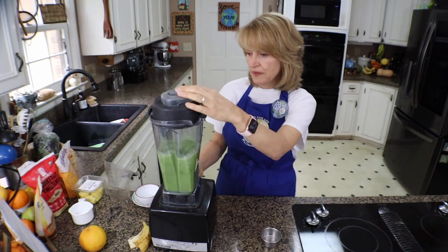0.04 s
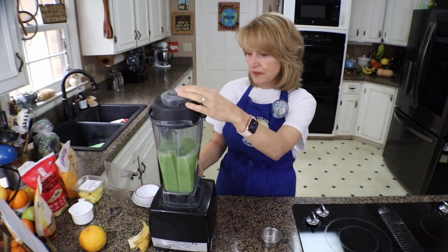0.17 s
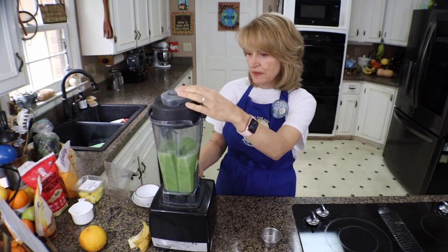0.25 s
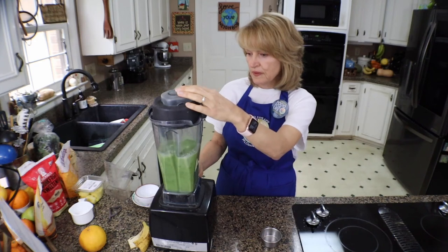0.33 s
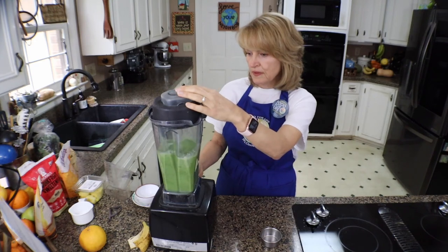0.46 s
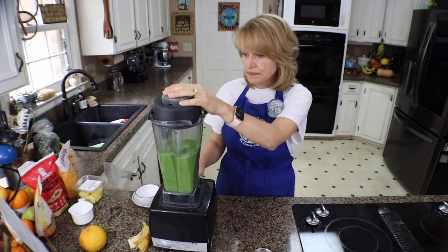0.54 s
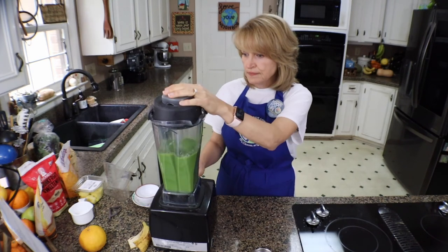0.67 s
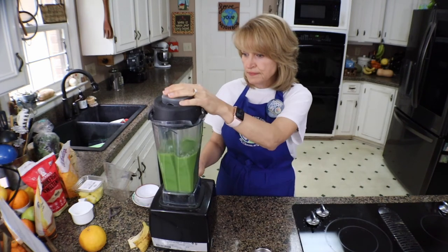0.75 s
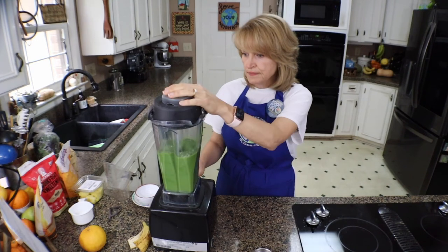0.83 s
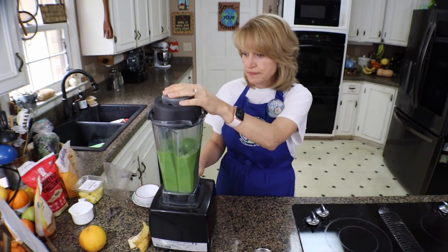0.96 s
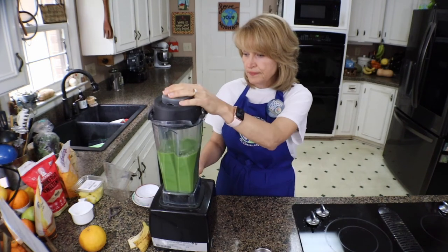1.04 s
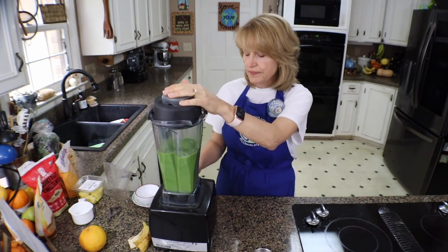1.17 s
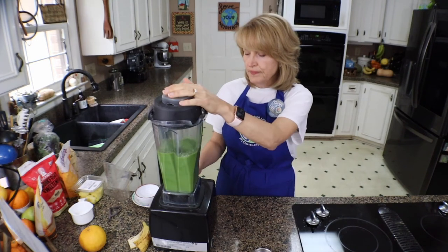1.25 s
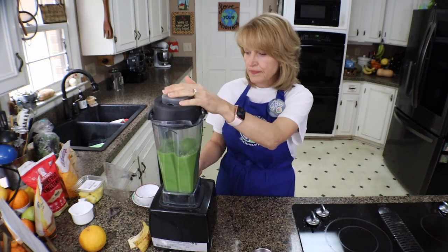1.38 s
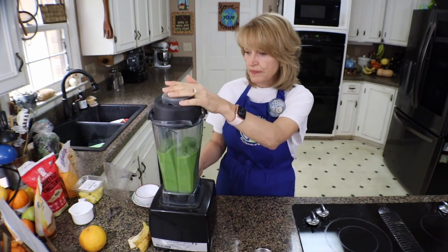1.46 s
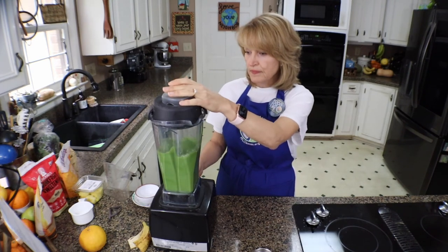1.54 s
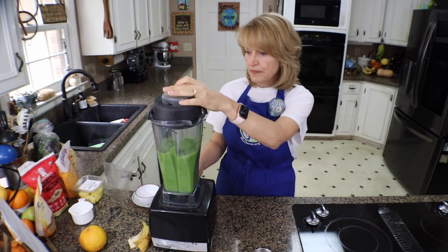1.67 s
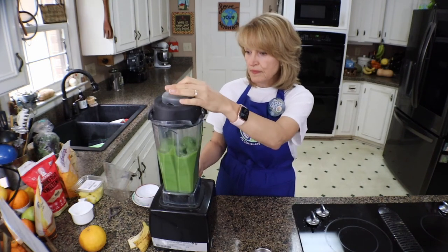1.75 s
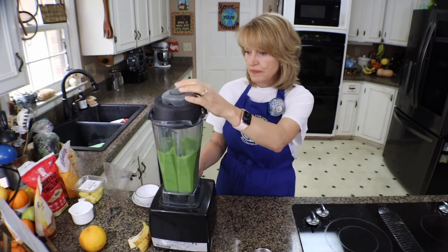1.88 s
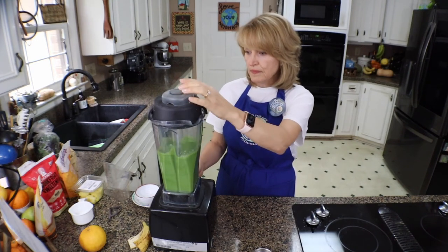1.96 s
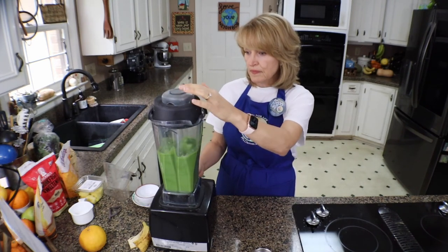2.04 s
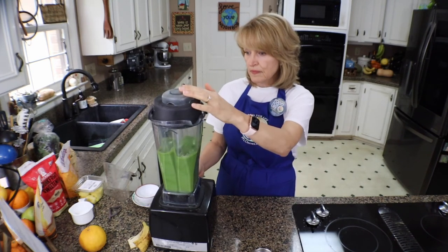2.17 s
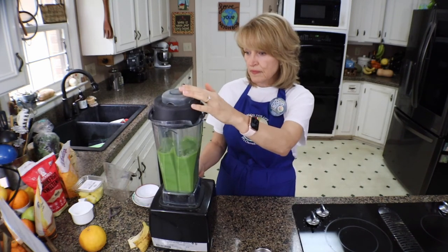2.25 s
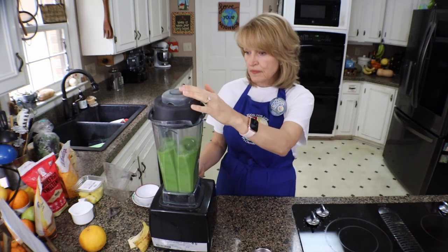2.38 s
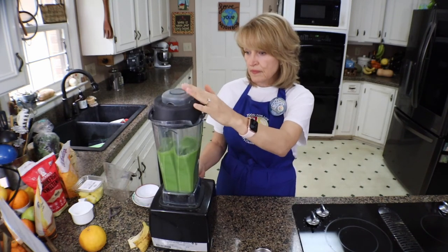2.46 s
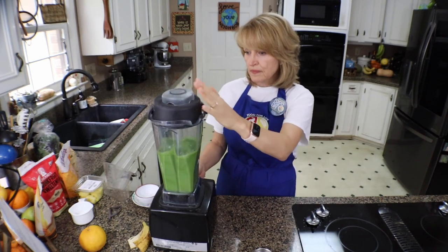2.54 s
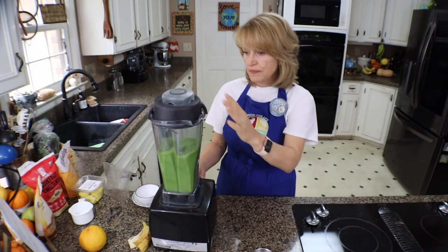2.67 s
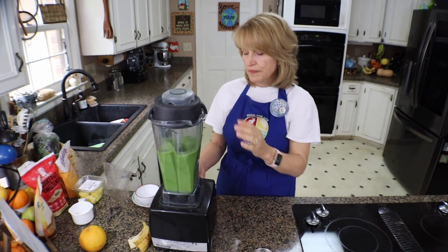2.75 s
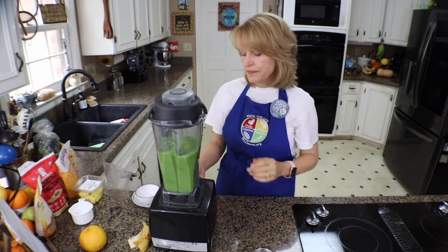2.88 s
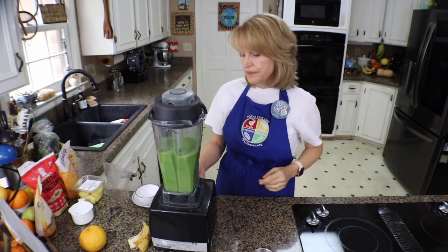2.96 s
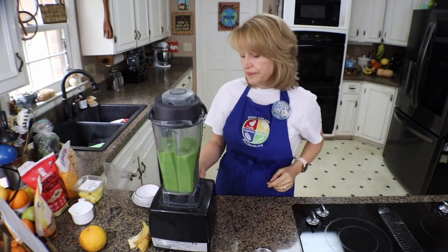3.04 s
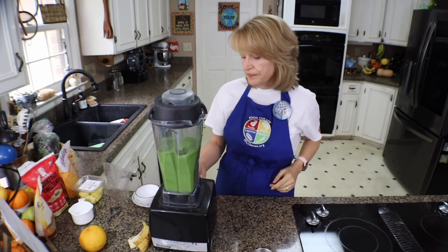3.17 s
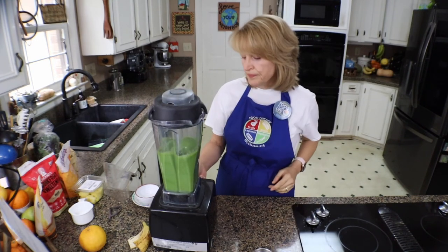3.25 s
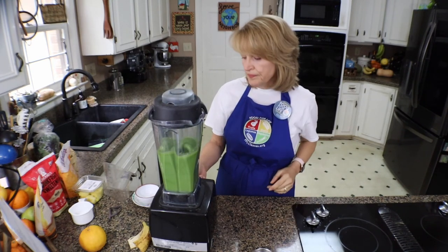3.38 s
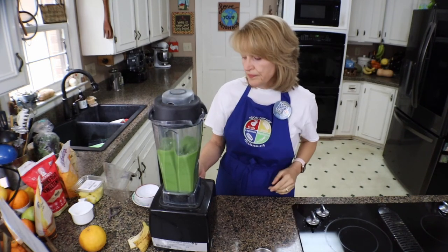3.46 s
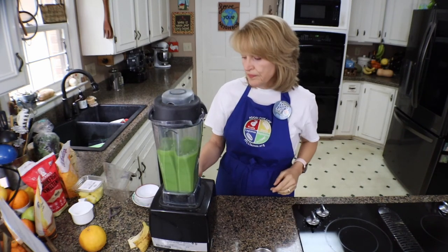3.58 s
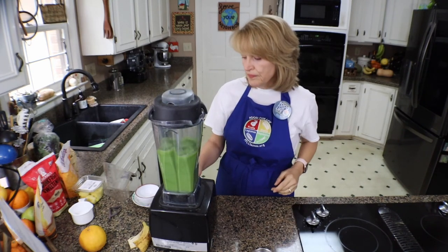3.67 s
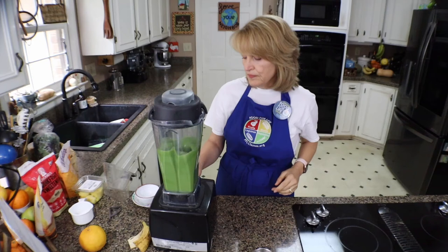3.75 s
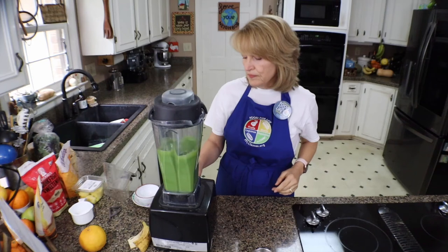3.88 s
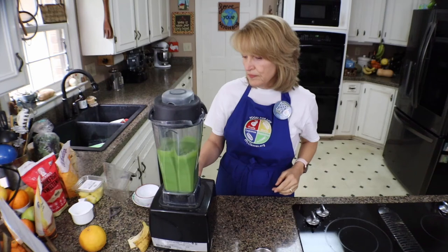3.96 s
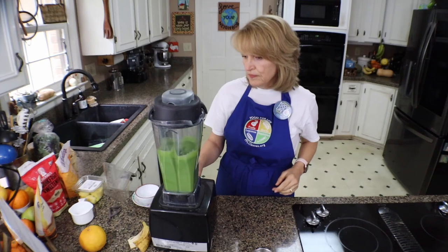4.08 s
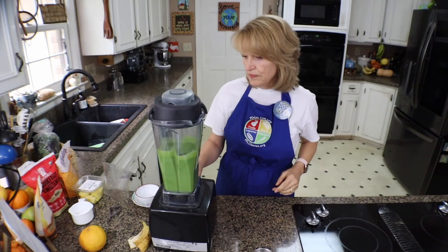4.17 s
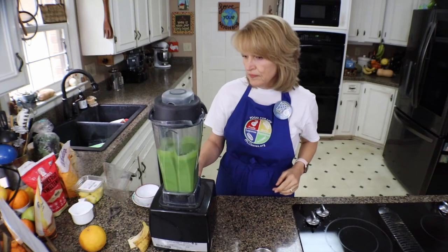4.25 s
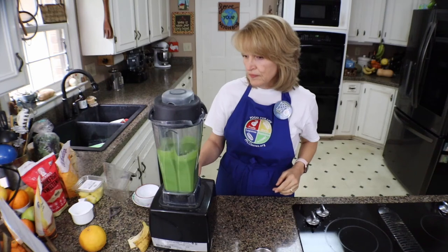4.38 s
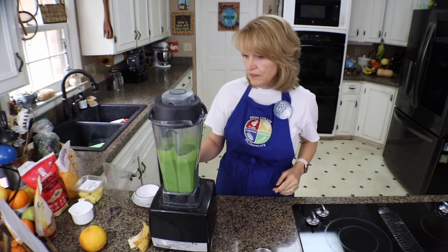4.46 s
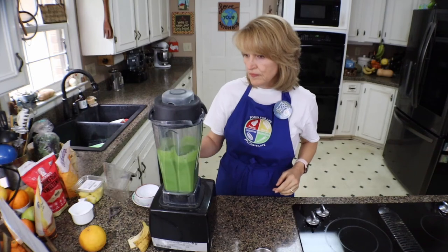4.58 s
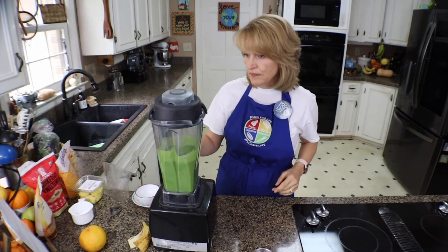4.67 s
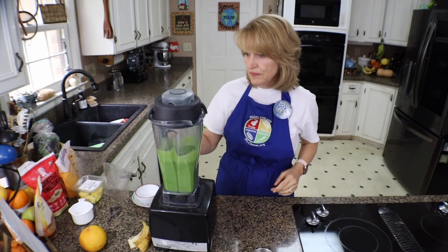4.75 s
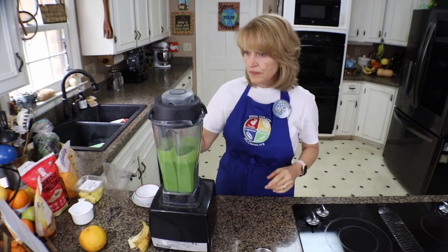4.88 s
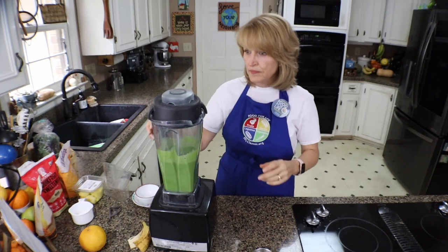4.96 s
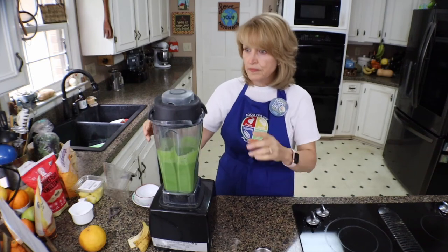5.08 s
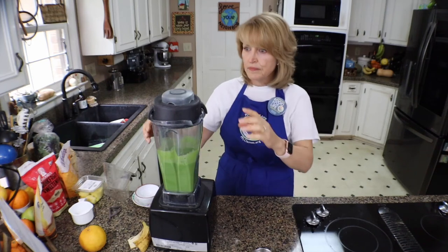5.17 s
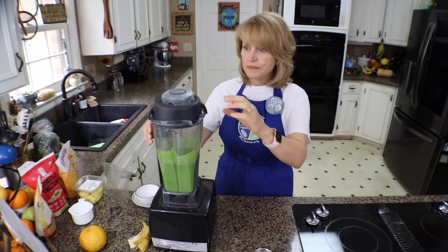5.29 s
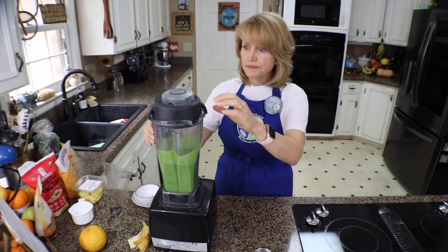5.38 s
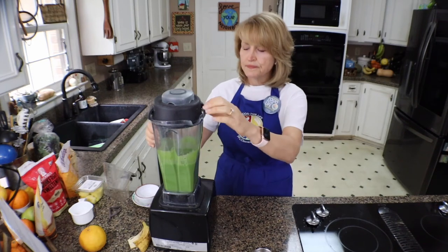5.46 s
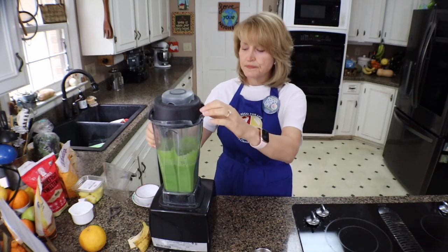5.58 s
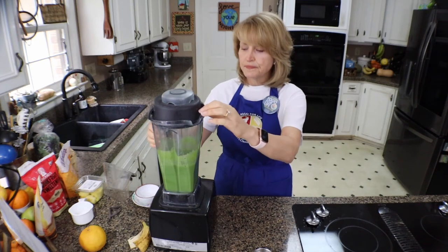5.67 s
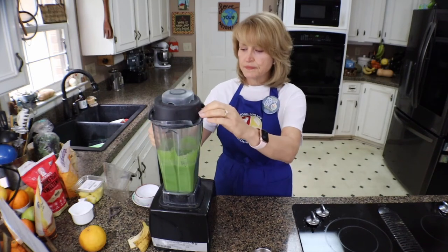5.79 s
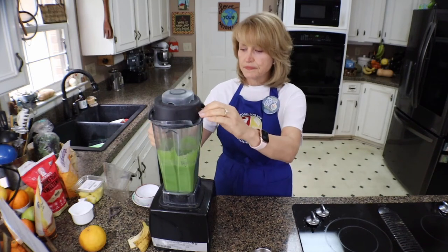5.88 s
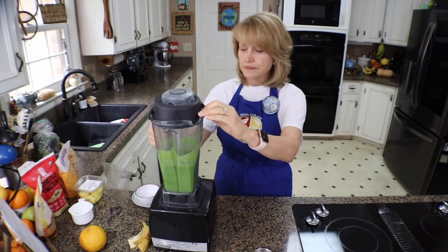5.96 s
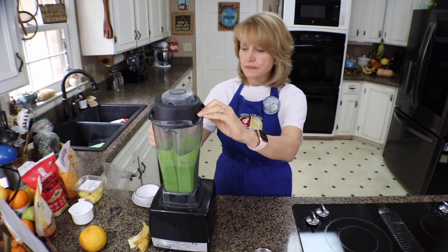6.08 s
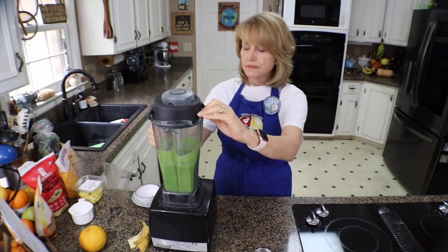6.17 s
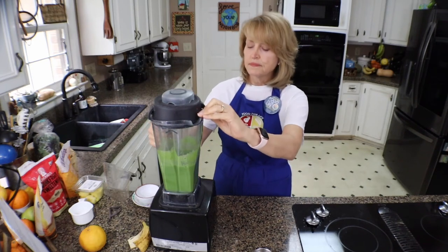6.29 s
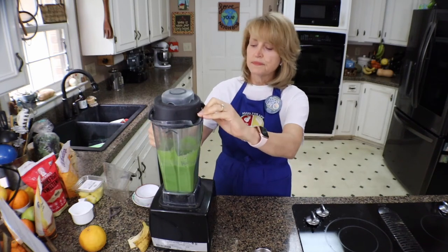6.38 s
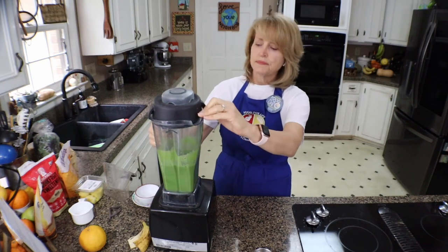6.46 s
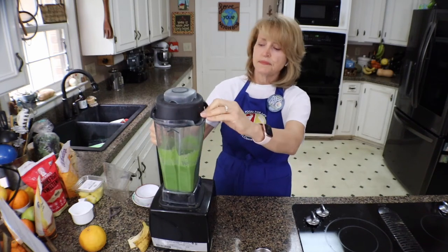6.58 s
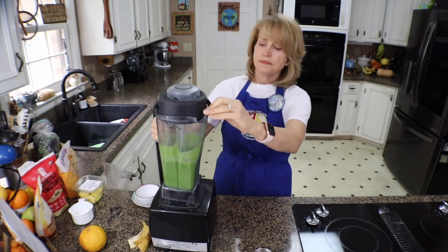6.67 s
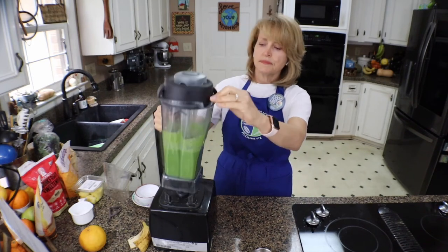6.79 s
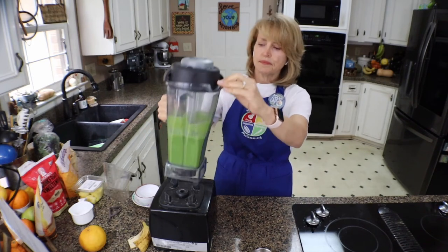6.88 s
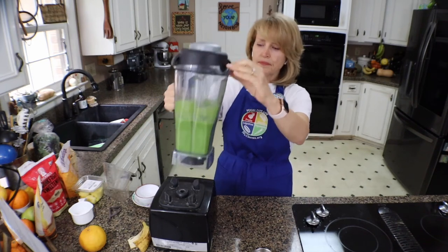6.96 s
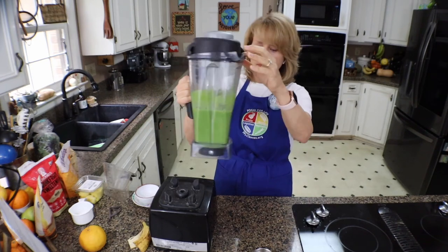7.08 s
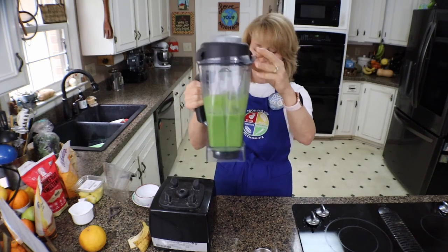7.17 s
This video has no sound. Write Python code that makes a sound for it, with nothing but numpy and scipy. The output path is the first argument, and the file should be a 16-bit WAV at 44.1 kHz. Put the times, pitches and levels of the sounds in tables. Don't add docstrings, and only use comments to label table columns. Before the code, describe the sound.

Loud close blender whine and churning roar for four seconds, a falling coast-down with knocks, then quiet plastic ticks and a jar lifted from its base.

```python
import sys
import numpy as np
from scipy import signal
from scipy.fft import rfft, irfft, next_fast_len
from scipy.io import wavfile
from scipy.ndimage import uniform_filter1d

SR = 44100
rng = np.random.default_rng(int(sys.argv[2]) if len(sys.argv) > 2 else 0)


def output_pcm(signal):
    pcm = np.clip(np.atleast_2d(signal).T, -1, 1) * 32767
    wavfile.write(sys.argv[1], SR, np.round(pcm).astype(np.int16))


def field_ratio(decibels):
    return 10 ** (np.asarray(decibels, dtype=float) / 20)


N = 318837
T = np.arange(N) / SR
FULL_TURNS = 352


def rms_one(x):
    return x / np.sqrt(np.mean(x ** 2) + 1e-20)


def drift(rate):
    r = np.exp(-40 * np.pi * rate / SR)
    slow = signal.lfilter([1], [1, -2 * r, r * r], rng.standard_normal(N // 20 + 4002))[4000:]
    return np.interp(np.arange(N) / 20, np.arange(len(slow)), rms_one(slow - slow.mean()))


def flutter(db, rate):
    r = np.exp(-64 * np.pi * rate / SR)
    slow = signal.lfilter([1], [1, -2 * r, r * r], rng.standard_normal(N // 32 + 3002))[3000:]
    return np.interp(T * SR / 32, np.arange(len(slow)), field_ratio(db * rms_one(slow - slow.mean())))


def resonance(x, hz, width):
    r = np.exp(-np.pi * width / SR)
    poles = [1, -2 * r * np.cos(2 * np.pi * hz / SR), r * r]
    return signal.lfilter([(1 - r * r) / 2, 0, (r * r - 1) / 2], poles, x + 1e-18)


def butter(x, order, hz, kind):
    return signal.sosfilt(signal.butter(order, hz, kind, fs=SR, output="sos"), x)


def coloured(spectrum, patchy_db):
    size = next_fast_len(N)
    hz = np.maximum(np.arange(size // 2 + 1) * SR / size, 1)
    point_hz, point_db = np.transpose(spectrum)
    shape = field_ratio(np.interp(np.log(hz), np.log(point_hz), point_db))
    shaped = rfft(rng.standard_normal(size)) * shape
    octave, out = np.clip(np.log2(hz / 60), 0, 8), 0
    for k in range(9):
        patch = np.sqrt(np.clip(1 - abs(octave - k), 0, 1))
        out = out + irfft(shaped * patch, size)[:N] * flutter(patchy_db, 1.93)
    return rms_one(out)


def shaft():
    # time in seconds, turns per second, hum in dB.
    running = [(0.0, 349.5, -26), (0.15, 346, -27.5), (0.5, 345, -30), (0.57, 333, -26.5), (0.68, 344, -25),
               (1.05, 352.5, -29), (1.5, 353, -28), (1.9, 353.3, -25), (2.25, 352.6, -26.5),
               (3.15, 353.5, -25), (3.45, 352.5, -29), (3.6, 355, -25), (3.72, 350.8, -30),
               (3.81, 342, -27), (3.865, 314, -41), (3.91, 295, -31), (3.98, 276, -27.5), (4.02, 268, -47)]
    drag_s, friction_turns = .66, 6
    feet_turns, feet_width, feet_db = 207, 14, 11
    hum_law = 1.9
    s, turns, hum_db = np.transpose(running)
    off_s, off_turns = s[-1], turns[-1]
    turns, hum_db = np.interp(T, s, turns), np.interp(T, s, hum_db)
    free = (off_turns + friction_turns) * np.exp(-np.maximum(T - off_s, 0) / drag_s) - friction_turns
    turns = np.where(T > off_s, np.maximum(free, 2), turns)
    fading_db = hum_law * 20 * np.log10(turns / off_turns)
    fading_db += feet_db * np.exp(-((turns - feet_turns) / feet_width) ** 2)
    return turns, hum_db + (T > off_s) * fading_db


def hum(turns, hum_db):
    # multiple of the shaft speed, level in dB.
    orders = [(2, -9), (3, -12.5), (4, -10), (5, -15), (6, -22), (7, -16.5), (9, -19.5), (10, -17),
              (13, -28.5)]
    phase = 2 * np.pi * np.cumsum(turns * (1 + .004 * drift(25.4))) / SR
    crossing = 1 + .4 * np.exp(-((turns - 285) / 15) ** 2)
    out = np.sin(phase) * flutter(0.73, 31) * crossing
    for order, order_db in orders:
        strength = field_ratio(order_db) * (turns / FULL_TURNS) ** 3.3 * flutter(2.5, 6.6)
        out += strength * np.sin(order * (phase + 0.0095 * drift(30)) + rng.uniform(0, 8.64))
    return np.sqrt(2) * field_ratio(hum_db - 0.3) * out


def churn(turns):
    # time in seconds, roar change in dB, length in seconds.
    gulps = [(0.0, 0, .03), (0.403, 0.5, 0.068), (0.6, 1, 0.097), (1.05, 1, 0.28), (1.647, -1, 0.12),
             (1.787, 1, .04), (2.32, 0, 0.032), (2.405, -3, 0.03), (2.627, -0.5, 0.034), (2.765, 0.5, .06),
             (3.695, 0.5, 0.036), (3.903, 0, 0.025), (3.98, -2, 0.042), (4.202, -2.5, 0.17),
             (5.084, 4.5, 0.31), (5.426, -4.5, 0.038), (5.455, -0.5, .02)]
    # time in seconds, change in dB, length in seconds.
    splashes = [
        (.65, -1, .15),
        (1.15, 0.5, 0.14),
        (2.22, -2.5, 0.11),
        (2.65, 0, 0.036),
        (3.05, 0.5, 0.087),
        (3.37, 2, 0.082),
        (4.45, -2, .1),
        (4.8, 7.5, 0.15),
    ]
    rest_s, rest_db_per_s = 5.47, 146

    def swells_db(rows):
        return sum(db * np.exp(-((T - s) / length) ** 2) for s, db, length in rows)

    speed_db = 20 * np.log10(turns / FULL_TURNS)
    gulp_db = swells_db(gulps)
    rest_db = -rest_db_per_s * np.maximum(T - rest_s, 0)
    wander_db = 3 * drift(3.2) * turns / FULL_TURNS
    wobble_db = -np.exp(-np.log(turns / 45) ** 2 / 0.15)
    roar_db = -21 + 1.68 * speed_db + gulp_db + rest_db
    spray_db = -31 + 2.21 * speed_db + 0.87 * gulp_db + swells_db(splashes) + rest_db
    rumble_db = -34.5 + 0.64 * speed_db + wander_db + wobble_db + 0.62 * gulp_db + rest_db
    return roar_db, spray_db, rumble_db


def slurry(turns, roar_db, spray_db):
    # frequency in Hz, level in dB per Hz.
    turbulence = [(20, -42), (55, -35), (76, -31), (107, -23), (291, -16), (346, -2.5), (420, -4.5),
                  (1170, -8.5), (1410, -6), (1960, -8), (2470, -13), (6000, -35.5), (7800, -54.5),
                  (13200, -120)]
    # frequency in Hz, level in dB per Hz.
    spray = [(1800, -36), (3000, -14), (3550, 0), (4600, -7.5), (6500, -7.5), (9500, -11.5), (10100, -20.5),
             (10600, -17), (12500, -18), (12950, -25.5), (13500, -22), (14400, -20), (15250, -20.5),
             (15450, -20.5), (16000, -26.5)]
    # frequency in Hz, width in Hz, dB over the roar at full speed, dB when coasting.
    jar = [(285, 68, 9, 12.5), (350, 37, 4, -3), (507, 65.5, 1, 2.5), (558.3, 20, 1.5, -2.5),
           (639, 40, 1, 0), (700, 140, 2.5, -8), (875.5, 22, 15.5, 9.5), (991, 35, 8.5, 7.5),
           (1070, 190, -3.5, 4.5), (1063, 25, 0.5, 8.5), (1225, 45, 4.5, -2), (1407, 62, 8, 0),
           (1510, 240, -1.5, 3.5), (1717, 58, 8, 8), (2100, 70, 2.5, 5.5), (2343, 47, -0.5, 10),
           (2453, 99, 6, -3), (2545, 93, 7.5, -5), (2815, 250, 5.5, 12), (3400, 110, 8, 5),
           (3550, 70, 14, 6), (4516, 290, 16.5, 9.5), (3675, 50, 7.5, 0), (1970, 31, -2, -1),
           (7000, 120, 8, 3.5), (7840, 120, 9.5, -4.5)]
    slap_db, buzz_db = 1.5, .8
    surge = flutter(0.44, 5)
    fast = np.clip(turns / 200 - .7, 0, 1)
    slow = np.clip((98 - turns) / 46, 0, 1)

    hits = rng.random(N) < 900 / SR
    chips = hits * field_ratio(2.6 * np.minimum(rng.exponential(1, N), 5)) * rng.choice([-1, 1], N)
    push = coloured(turbulence, patchy_db=-2.0) + field_ratio(-10) * resonance(rms_one(chips), 2200, 3000)
    roar = push.copy()
    for hz, width, fast_db, slow_db in jar:
        gain = fast * field_ratio(fast_db) + (1 - fast) * field_ratio(slow_db)
        roar += gain * flutter(1.5, 11) * resonance(push, hz, width)
    roar = roar / np.sqrt(uniform_filter1d(roar ** 2, size=SR // 5))

    hiss = coloured(spray, patchy_db=-1.0)
    hiss = (1 - slow) * hiss + slow * 1.45 * butter(hiss, 8, 9000, "low")
    roar = (1 - slow) * roar + slow * butter(roar, 4, 7000, "low")
    turn_phase = 2 * np.pi * np.cumsum(turns) / SR
    surge = surge * field_ratio(slap_db * (1 - fast) * np.cos(turn_phase) + buzz_db * np.cos(2 * turn_phase))
    return surge * (field_ratio(roar_db) * rms_one(roar) + field_ratio(spray_db) * hiss)


def lumps():
    # time in seconds, frequency in Hz, width in Hz, rms in dB, length in seconds.
    flares = [(0.063, 1720, 59.6, -27, 0.024), (0.565, 644, 40.7, -26, 0.094),
              (0.576, 2470, 140, -28, 0.054), (0.76, 1400, 50.5, -21, 0.058), (1.1, 2450, 89.3, -27, .05),
              (0.981, 1450, 130, -17, 0.0312), (1.297, 1434, 60, -25, 0.066), (2.563, 1725, 81, -22, 0.06),
              (2.9, 1431, 61, -23.5, 0.045), (4.121, 1580, 350, -32.5, 0.11),
              (4.08, 135, 29.7, -41.5, 0.054), (4.3, 1100, 200, -34.5, 0.08), (4.4, 1005, 84, -38, 0.16),
              (4.45, 1350, 150, -45, 0.044), (4.15, 114, 30, -46, .05), (4.33, 110, 40, -50, .12),
              (5.2, 96, 20, -59, 0.11), (6.675, 560, 230, -53, 0.033), (6.355, 540, 400, -63, .03),
              (1.43, 1420, 50, -24, .07), (1.74, 1410, 40, -30.5, .1), (.85, 2480, 150, -31, .15),
              (2.09, 875, 40, -28, .04), (5.81, 330, 150, -65, .04), (3.85, 660, 63, -33, 0.16),
              (4.1, 865, 40, -38, .1), (6.75, 52, 40, -63, 0.16), (6.8, 4750, 200, -64, .02),
              (6.815, 3300, 350, -60, .03), (6.682, 1660, 360, -58, .025), (6.535, 1620, 100, -67, 0.016),
              (4.934, 268, 64, -40.5, 0.064), (5.396, 1065, 28, -57.5, 0.1),
              (5.621, 660, 400, -67.5, 0.091), (4.8, 180, 23, -47, .06), (5.05, 177, 24, -50, .1),
              (6.36, 1500, 2500, -66, .04), (6.771, 1900, 1200, -59, 0.029), (6.82, 1800, 1200, -64, 0.036)]
    out, white = np.zeros(N), rng.standard_normal((len(flares), SR // 2))
    for (s, hz, width, db, length), noise in zip(flares, white):
        part = slice(max(round(s * SR) - SR // 4, 0), round(s * SR) + SR // 4)
        swell = field_ratio(db) * np.exp(-2 * ((T[part] - s) / length) ** 2)
        note = resonance(resonance(noise, hz, width), hz, width)[-len(swell):]
        out[part] += swell * note * np.sqrt(np.sum(swell ** 2) / np.sum((swell * note) ** 2))
    return out


def base(turns, rumble_db):
    # frequency in Hz, width in Hz, level in dB.
    base_notes = [(162, 130, 0.5), (244, 51, -4.5), (285, 9.6, 8), (335, 55, -17)]
    each_turn = np.diff(np.floor(np.cumsum(turns) / SR), prepend=0)
    knocks = each_turn * field_ratio(1.8 * rng.standard_normal(N)) * np.sqrt(SR / turns)
    knocks = butter(knocks, 2, [150, 700], "band")
    share = np.clip(1.1 - turns / 120, 0, .6)
    push = share * knocks + (1 - 0.12 * share) * rng.standard_normal(N)
    body = sum(field_ratio(db) * resonance(push, hz, width) for hz, width, db in base_notes)
    body = butter(body, 4, 150, "high")
    return field_ratio(rumble_db) * rms_one(body)


def thuds():
    # time in seconds, base note in dB, its Hz, hollow note in dB, its Hz.
    blows = [(5.026, -34, 287, -65, 600), (5.061, -30, 270, -55, 1000), (5.161, -30, 290, -65, 600),
             (5.199, -29, 310, -60, 600), (5.222, -29, 334, -60, 600), (5.245, -30, 292, -65, 600),
             (5.275, -29, 320, -65, 900), (5.328, -33, 322, -62, 1050), (5.385, -37, 300, -65, 1050),
             (5.443, -28.5, 226, -58.5, 1070), (5.459, -32, 280, -60, 700), (5.533, -51, 294, -61, 1060),
             (5.634, -68.5, 281, -57, 1054), (5.786, -52, 285, -59, 960), (6.194, -55, 269, -66.5, 883),
             (6.338, -59, 288, -59, 806), (6.531, -39, 278, -63, 1000), (6.548, -34, 296, -66, 900),
             (6.607, -45, 300, -50, 940), (6.663, -23, 350, -56, 785), (6.671, -50, 350, -46, 800),
             (6.685, -22, 333, -42.5, 766), (6.714, -34, 335, -50, 900), (6.742, -35, 320, -50, 835),
             (6.77, -35, 335, -37, 874), (6.782, -36, 335, -38, 894), (6.81, -29, 324, -43, 1004),
             (6.82, -53, 322, -37.5, 863), (6.836, -38, 284, -47, 845), (6.852, -52, 300, -50, 870),
             (6.872, -46, 300, -54, 935), (6.89, -54, 290, -56, 950), (6.628, -52, 300, -57, 1000),
             (6.79, -45, 335, -42, 882), (6.991, -56, 234, -55, 1000), (7.03, -49, 258, -46.5, 970),
             (7.118, -53, 223, -60.5, 1000)]
    base_t60_s, hollow_t60_s = .07, .075
    out, t = np.zeros(N), T[:SR // 4]
    for s, db, hz, hollow_db, hollow_hz in blows:
        low = field_ratio(db + 3) * (1 - np.exp(-t / .007)) * np.sin(2 * np.pi * hz * t)
        hollow = np.sin(2 * np.pi * hollow_hz * t) + 0.31 * np.sin(2 * np.pi * 1.09 * hollow_hz * t)
        hollow = field_ratio(hollow_db + 3.5) * (1 - np.exp(-t / 0.0011)) * hollow
        blow = low * field_ratio(-60 * t / base_t60_s) + hollow * field_ratio(-60 * t / hollow_t60_s)
        at = round(s * SR)
        out[at:at + len(t)] += blow[:N - at]
    return out * flutter(1.2, 60)


def ticks():
    # time in seconds, peak in dB, centre in Hz.
    taps = [(4.972, -54, 5500), (5.073, -51, 6000), (5.1384, -58, 8000), (5.198, -58, 7500),
            (5.263, -63, 5000), (5.283, -60, 7500), (5.3025, -57, 3800), (5.347, -57, 7840),
            (5.465, -59, 9500), (5.466, -53, 3600), (5.335, -43, 2270), (5.381, -60, 2100),
            (5.478, -57, 7000), (5.535, -56, 2520), (5.6357, -52, 1200), (5.654, -55, 4330),
            (5.668, -58, 2600), (5.69, -53, 5500), (5.763, -52, 7320), (5.786, -57, 1600),
            (5.786, -63, 2800), (5.9376, -54.5, 2300), (5.991, -53, 4640), (6.0403, -57, 2100),
            (6.1915, -57, 2100), (6.2174, -55, 1900), (6.2643, -59, 2500), (6.336, -56, 3000),
            (6.345, -52, 1200), (6.405, -58, 4970), (6.668, -50, 1700), (6.686, -54, 1700),
            (6.675, -58, 3000), (6.725, -56, 7000), (6.757, -58, 3000), (6.818, -56, 3300),
            (6.82, -52, 1300), (6.7165, -38, 6500), (6.7165, -44, 3800), (6.716, -49, 11000),
            (6.7165, -50, 14500), (6.716, -51, 2200), (6.991, -52, 1800), (7.0295, -42.5, 3400),
            (7.0295, -51, 1500), (6.991, -57, 3500), (7.0953, -51, 2300), (7.097, -52, 5950),
            (7.118, -61, 2000), (7.201, -51, 4220)]
    out, t = np.zeros(N), T[:SR // 4]
    white = rng.standard_normal((len(taps), len(t)))
    for (s, db, hz), noise in zip(taps, white):
        t60 = 0.06 * (2000 / hz) ** 0.5
        burst = noise * (field_ratio(-60 * t / max(t60, .005)) + 0.83 * np.exp(-t / 0.00043))
        burst[0] += 6
        burst = resonance(resonance(burst, hz, .55 * hz), hz, .8 * hz)
        at = round(s * SR)
        out[at:at + len(t)] += (field_ratio(db) * burst / abs(burst).max())[:N - at]
    return out


def slide():
    # frequency in Hz, width in Hz, level in dB.
    rim = [(856, 130, 11.5), (1240, 190, 20), (1700, 170, 10), (2076, 220, -7), (3200, 400, -2),
           (4640, 260, -14.5)]
    start_s, grow_s = 6.712, .105
    start_db, grow_db, fall_db_per_s = -60.5, 5, 276
    slips = (rng.random(N) < 5000 / SR) * rng.standard_normal(N)
    body = field_ratio(-11) * resonance(slips, 1500, 2500)
    body = body + sum(field_ratio(db) * resonance(slips, hz, width) for hz, width, db in rim)
    since = T - start_s
    growing_db = start_db + grow_db * np.minimum(since / grow_s, 1)
    falling_db = fall_db_per_s * np.maximum(since - grow_s, 0)
    slide_db = np.where(since < 0, start_db - 15 + 120 * since, growing_db - falling_db)
    return field_ratio(slide_db + 3) * rms_one(body)


def kitchen(x):
    t60_s, wall_cut_hz = 0.3, 5100
    size = next_fast_len(N + SR)
    w = 2 * np.pi * np.arange(size // 2 + 1) / size
    dull = 1 / np.sqrt(1 + (w * SR / (2 * np.pi * wall_cut_hz)) ** 2)
    echoes = 0
    for lag_s in rng.uniform(0.0061, 0.037, 10):
        loop = field_ratio(-60 * lag_s / t60_s) * dull * np.exp(-1j * w * lag_s * SR)
        echoes = echoes + loop / (1 - loop)
    return irfft(rfft(x, size) * echoes, size)[:N]


def room_tone():
    # frequency in Hz, level in dB per Hz.
    air = [(15, -41.5), (25, -10), (60, -6), (87, -5), (463, -13.5), (641, -15), (695, -16), (2160, -25.5),
           (5880, -29), (6560, -28.5), (10100, -32), (16000, -28.5)]
    fridge_hz, fridge_db = 410, -11
    lift_db = 7 * np.maximum(T - 5.9, 0)
    duck_db = -14 * np.clip((5.4 - T) / 0.12 + 1, 0, 1)
    fridge = rms_one(resonance(rng.standard_normal(N), fridge_hz, 12))
    return field_ratio(-67.5 + lift_db + duck_db) * (coloured(air, patchy_db=-1.0) + field_ratio(fridge_db) * fridge)


def scene():
    turns, hum_db = shaft()
    roar_db, spray_db, rumble_db = churn(turns)
    blender = hum(turns, hum_db) + slurry(turns, roar_db, spray_db) + lumps() + base(turns, rumble_db)
    hands = thuds() + ticks() + slide()
    mono = blender + hands + field_ratio(-24) * kitchen(hands) + room_tone()
    return np.array([mono, mono])


def thin(x, above_hz, share):
    hz, s, lines = signal.stft(x, SR, nperseg=1024)
    usual = uniform_filter1d(abs(lines), size=16, axis=-2)
    lines[(abs(lines) < share * usual) & (hz > above_hz)[:, None]] = 0
    luck = rng.random((2, 100, len(s) // 3 + 1))
    gain = field_ratio(1.5 * (2 * luck[0] - 1)) * np.where(luck[1] < .015, .3, 1)
    gain = gain[(hz / 260).astype(int)][:, np.arange(len(s)) // 3]
    lines *= np.where((hz > 2.6 * above_hz)[:, None], gain, 1)
    return signal.istft(lines, SR, nperseg=1024)[1][..., :N]


def starve(x):
    # time in seconds, lower edge in Hz, level in dB, share left in gaps 0-1.
    starved = [(.41, 4500, 0, .12), (.968, 4500, 0, .15), (2.099, 4000, 1, .1), (2.44, 4000, 0, .15),
               (2.547, 4800, 0, .2), (4.165, 5000, -3, .12), (4.927, 4800, -1, .02), (5.915, 2500, 0, .3),
               (6.302, 3000, 0, .3), (6.365, 3500, -2, .25), (6.793, 4000, -1, .2), (6.93, 1600, -3, .03)]
    x, half = x.copy(), round(.021 * SR)
    window = np.hanning(2 * half)
    hz = np.arange(half + 1) * SR / (2 * half)
    odds = np.where(np.arange(80) < 30, .5, .12)
    for s, edge_hz, db, gap in starved:
        part = slice(round(s * SR) - half, round(s * SR) + half)
        top = rfft(x[:, part] * window ** .25) * (hz > edge_hz)
        kept = np.where(rng.random(80) < odds, 1, gap)[(hz / 300).astype(int)]
        filler = field_ratio(db + 3) * kept * abs(top) * np.exp(2j * np.pi * rng.random(top.shape))
        fade = np.minimum(window ** 1.5 * (.85 + .03 / gap), 1)
        x[:, part] += fade * irfft(filler - top, 2 * half)
    return x


def top_cut(x):
    return signal.sosfilt(signal.butter(12, 16320, fs=SR, output="sos"), x)


def record(dry):
    mono = butter(dry[0], 2, 32, "high")
    mono = thin(mono, above_hz=3500, share=.72)
    stereo = starve(np.array([mono, mono]))
    mix = signal.sosfilt(signal.ellip(12, .5, 70, 15730, fs=SR, output="sos"), stereo)
    return top_cut(mix)


dry = scene()
out = record(dry)
output_pcm(out)
```